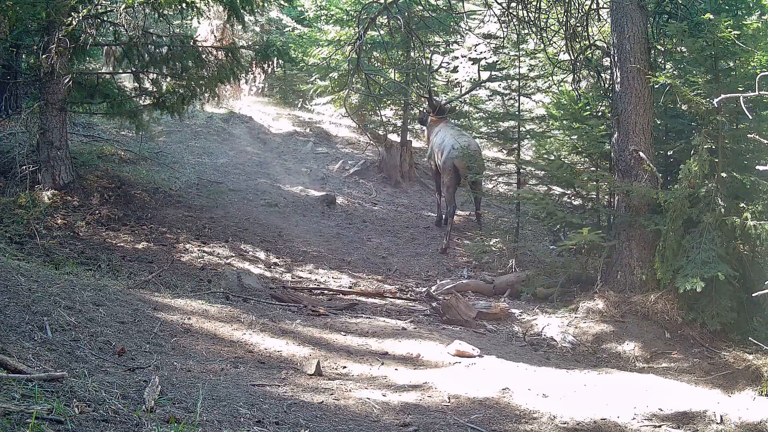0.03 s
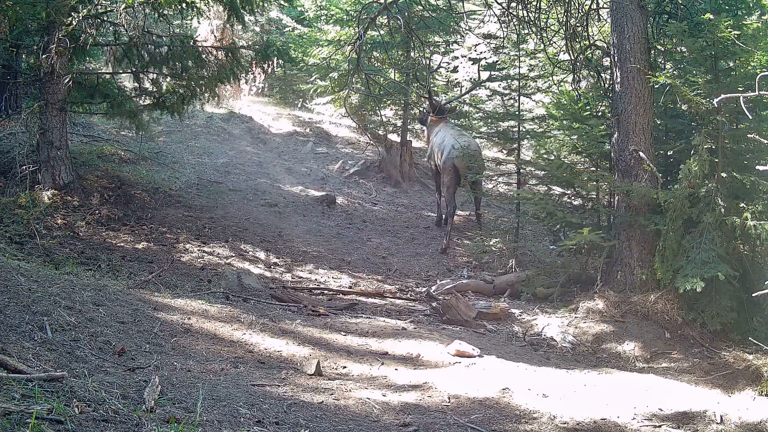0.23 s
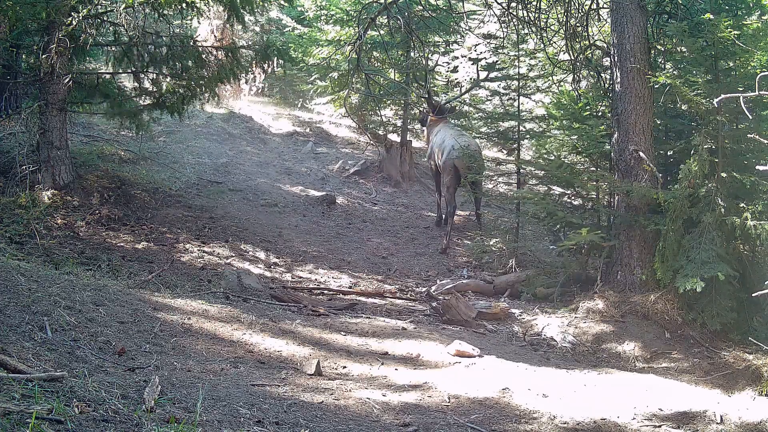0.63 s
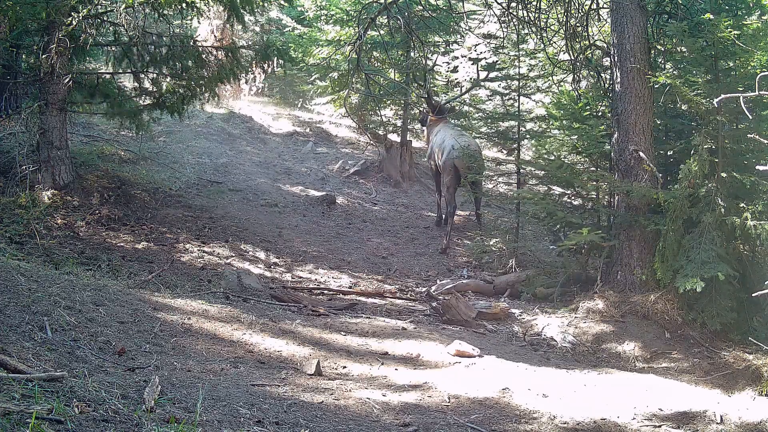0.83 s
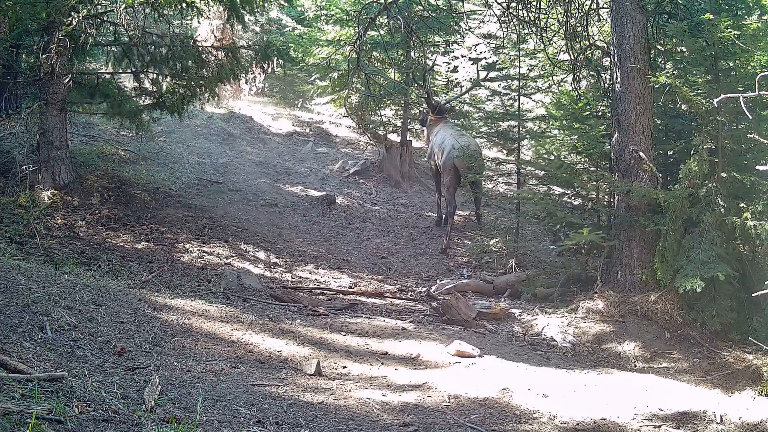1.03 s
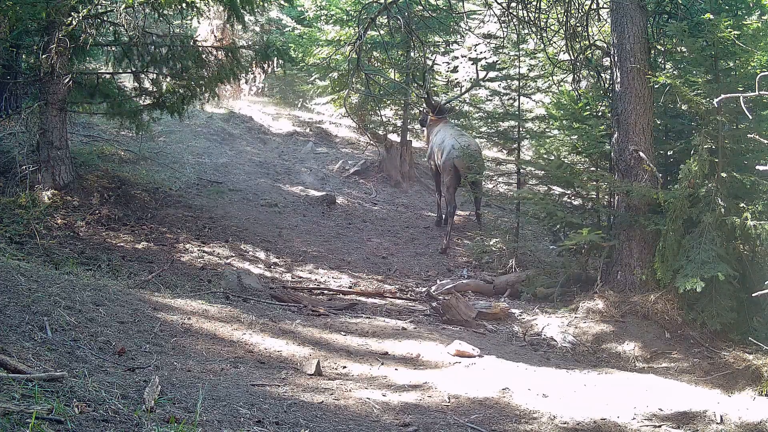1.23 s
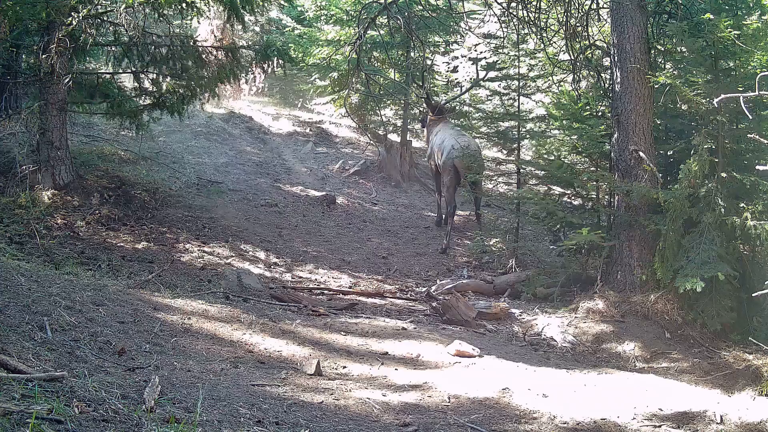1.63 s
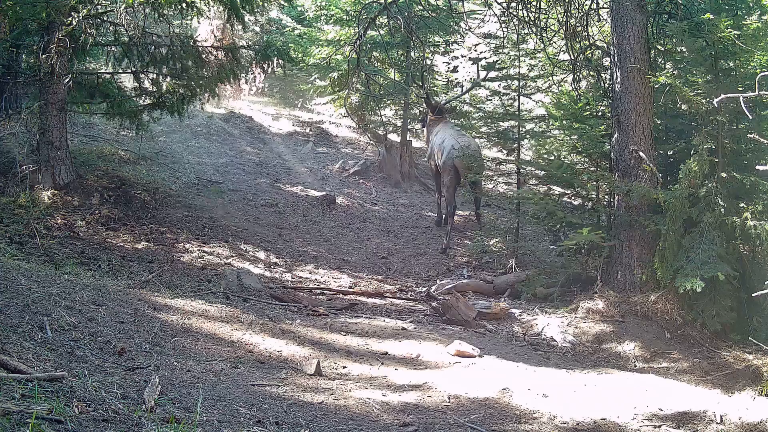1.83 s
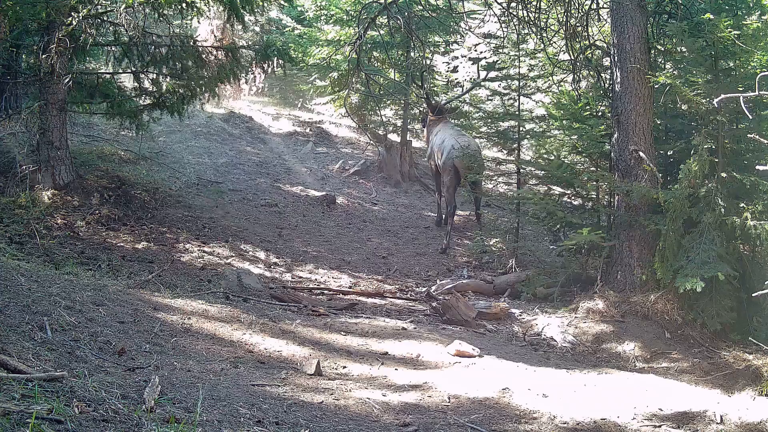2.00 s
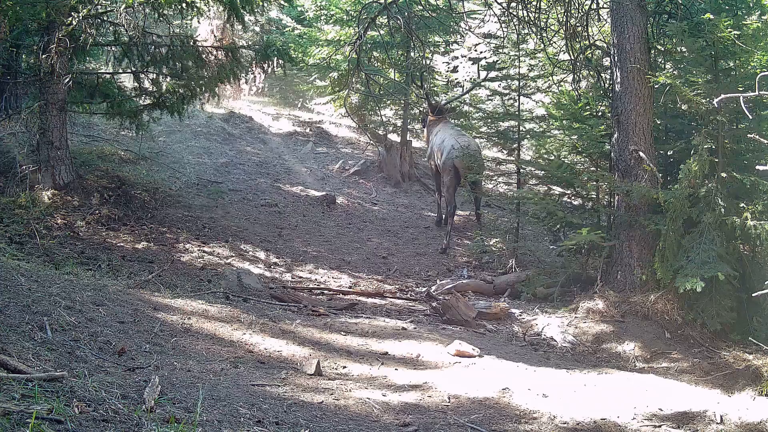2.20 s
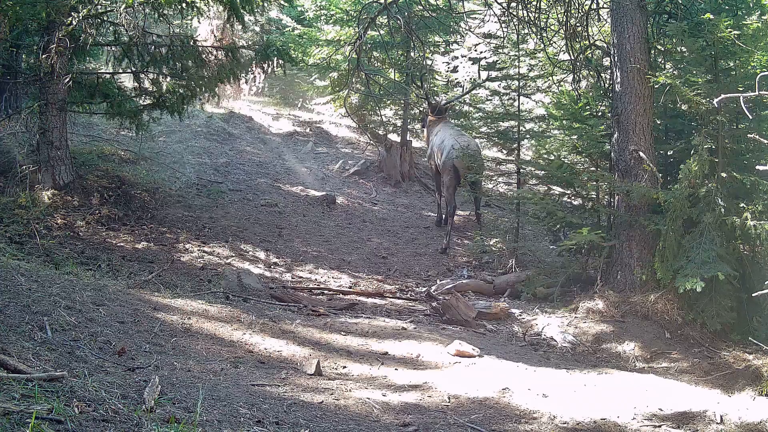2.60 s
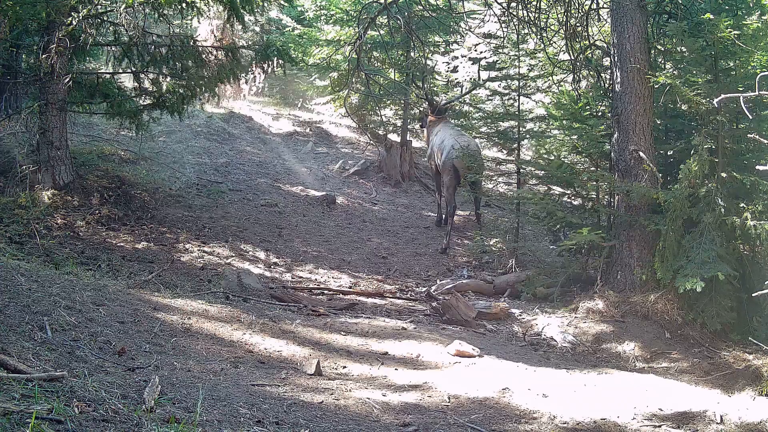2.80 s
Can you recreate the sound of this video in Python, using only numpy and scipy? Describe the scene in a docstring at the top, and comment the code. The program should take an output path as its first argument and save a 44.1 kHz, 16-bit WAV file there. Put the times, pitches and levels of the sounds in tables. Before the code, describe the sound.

Light wind buffeting the microphone in short, low puffs, over a faint forest hush.

```python
"""Light wind on a forest slope.

A quiet spot among trees. Right at the microphone, light wind buffets in short, low puffs,
and a few single eddies thump on it. Far behind lie the hush of the trees and a faint hiss,
with a soft swish, some brief dry rustles of twigs and three soft woody knocks."""
import sys
import numpy as np
from scipy import signal
from scipy.io import wavfile
from scipy.ndimage import uniform_filter1d

SR = 44100
rng = np.random.default_rng(int(sys.argv[2]) if len(sys.argv) > 2 else 0)


def dump(signal):
    """Clip the signal to [-1, 1] and save it as 16-bit WAV at the path in sys.argv[1]."""
    limited = np.clip(np.atleast_2d(signal).T, -1, 1)
    pcm = np.round(limited * 32767).astype(np.int16)
    wavfile.write(sys.argv[1], SR, pcm)


N = 130095
TIME = np.arange(N) / SR


def from_db(db):
    """Decibels to gain."""
    return 10 ** (np.asarray(db) / 20)


def unit_rms(x):
    """Scale to an rms of 1."""
    return x / np.sqrt(np.mean(x ** 2) + 1e-20)


def butter(x, hz, kind, order=2):
    """Butterworth filter."""
    return signal.sosfilt(signal.butter(order, hz, kind, fs=SR, output="sos"), x + 1e-18)


def resonance(x, hz, width_hz):
    """Ring x through one resonant peak; rms 1."""
    radius = np.exp(-np.pi * width_hz / SR)
    feedback = [1, -2 * radius * np.cos(2 * np.pi * hz / SR), radius ** 2]
    return unit_rms(signal.lfilter([1, 0, -1], feedback, x))


def drift(rate_hz):
    """Random wander, mostly slower than rate_hz; rms 1."""
    pole = np.exp(-2 * np.pi * rate_hz / SR)
    wander = signal.lfilter([1], [1, -2 * pole, pole ** 2], rng.standard_normal(N + SR))
    return unit_rms(wander[SR:])


def coloured_noise(colour, flicker_db=0):
    """Third-octave bands of noise, each with its own level and optional flicker; rms 1."""
    edges_hz = 20 * 2 ** (np.arange(28) / 3)
    hz, db = np.transpose(colour)
    white, out = rng.standard_normal((2, N + SR)), 0
    for k, (low, high) in enumerate(zip(edges_hz, edges_hz[1:])):
        band_db = np.interp(np.log(low * high) / 2, np.log(hz), db)
        if flicker_db:
            band_db = band_db + flicker_db * drift(20)
        out = out + from_db(band_db) * butter(white[k % 2], [low, high], "band")[SR:]
    return unit_rms(out)


def ramp(t, rise_s):
    """Smooth step from 0 to 1, centred on t = 0."""
    return .5 + .5 * np.sin(np.pi * np.clip(t / rise_s, -.5, .5))


def burst(peak_s, attack_s, decay_s):
    """Quick rise to peak_s, then exponential decay."""
    rise = ramp(TIME - peak_s + attack_s / 2, attack_s)
    return rise * np.exp(-np.maximum(TIME - peak_s, 0) / decay_s)


def puffs():
    """Short stretches of turbulence on the microphone; faster air reaches higher in pitch."""
    # puffs of wind: start_s, length_s, level_db, upper_edge_hz
    gusts = [(.02, 0.063, -55.5, 210), (0.08, 0.022, -47, 55), (0.194, 0.07, -29, 145),
             (0.289, .075, -34.5, 114), (0.414, 0.042, -30.5, 66.7), (0.455, 0.04, -45, 70),
             (0.517, 0.0885, -31.5, 150), (0.615, 0.037, -29, 105), (0.727, 0.026, -28.5, 104),
             (0.774, 0.047, -36, 94), (0.845, 0.081, -36.5, 96.5), (.92, 0.05, -39, 123.3),
             (1.047, 0.017, -55, 90), (1.138, 0.064, -38.5, 85), (1.472, 0.047, -43.5, 68.6),
             (1.559, 0.056, -49, 83), (1.641, 0.021, -41, 68), (1.697, 0.021, -36, 105),
             (1.734, 0.16, -45.5, 118), (1.806, 0.023, -28, 126.6), (1.837, 0.021, -37, 89),
             (1.961, 0.049, -35.5, 70.5), (1.995, 0.053, -32, 121.5), (2.056, 0.036, -39.5, 94),
             (2.171, 0.049, -35.5, 83), (2.389, 0.039, -25.5, 107.6), (2.453, 0.039, -28.5, 115),
             (2.491, 0.047, -48, 105), (2.524, 0.037, -26, 126), (2.575, 0.13, -40, 91.6),
             (2.616, 0.065, -25, 95), (2.68, 0.024, -35.5, 94), (2.708, 0.032, -49.5, 74.4),
             (2.808, 0.039, -42.5, 66.4)]
    attack_s, release_s, even_s = .022, .023, .031
    out = np.zeros(N + 2 * SR)
    t = np.arange(SR) / SR - .5
    for start_s, length_s, level_db, edge_hz in gusts:
        air = butter(rng.standard_normal(SR), edge_hz, "low", order=5)
        air = butter(air, .37 * edge_hz, "low", order=1)  # the spectrum tilts down below the edge
        air = butter(air, .13 * edge_hz, "high")
        power = uniform_filter1d(np.abs(signal.hilbert(air)) ** 2 / 2, int(even_s * SR) + 1)
        even_air = air / np.sqrt(power + 1e-20)  # turbulence keeps its strength over even_s
        gate = ramp(t, attack_s) * ramp(length_s - t, release_s)
        at = int((start_s + .5) * SR)
        out[at:at + SR] += from_db(level_db) * gate * even_air
    return out[SR:SR + N]


def thumps():
    """An eddy passing the microphone gives one swing of pressure, push then pull."""
    # single eddies: time_s, peak_db, centre_hz
    eddies = [(.211, -33.5, 101), (0.236, -41, 130), (.358, -35, 108), (.436, -30.5, 50),
              (0.608, -19, 91.8), (0.757, -35.5, 131), (.902, -25, 78.7), (.953, -38.5, 115),
              (1.703, -38, 69), (1.786, -20, 102.8), (2.627, -29, 75.3)]
    out = np.zeros(N)
    for time_s, peak_db, centre_hz in eddies:
        phase = 2 * np.pi * centre_hz * (TIME - time_s)
        out -= from_db(peak_db) * phase * np.exp((1 - phase ** 2) / 2)
    return out


def draught():
    """Lightly moving air keeps up a low, wavering rumble between the puffs."""
    # strength of the draught: time_s, level_db
    strength = [(0, -54.5), (.15, -58.5), (.5, -51), (1.0, -52.5), (1.25, -53.5), (1.38, -55), (1.6, -47),
                (1.92, -52), (2.3, -51), (2.77, -55.5), (2.95, -54.5)]
    # its spectrum: frequency_hz, relative_db
    colour = [(20, 4), (50, 4), (100, -8.5), (160, -13.5), (250, -21.5), (400, -41.5), (800, -54)]
    level_db = np.interp(TIME, *np.transpose(strength)) + drift(2.7)
    return from_db(level_db) * coloured_noise(colour)


def wind():
    """Puffs and thumps enter the microphone port, which passes a low band, over the draught."""
    port_low_hz, port_high_hz = 22.4, 267
    buffets = butter(puffs() + thumps(), port_high_hz, "low", order=4)
    return butter(buffets, port_low_hz, "high") + draught()


def knocks():
    """A rough contact on wood rings two damped resonances and scuffs the ground."""
    # soft knocks: peak_s, level_db, decay_s, pitch_hz, overtone_db, scuff_db
    contacts = [(.553, -53, .007, 1110, -72, -58.5), (.833, -63.5, .02, 1030, -66, -58),
                (1.698, -60, .014, 650, -78, -78)]
    # spectrum of the scuff: frequency_hz, relative_db
    colour = [(200, -9.5), (350, 2), (600, 4.5), (1000, 3), (1400, -18), (1800, -16), (2200, -18),
              (5000, -51.5)]
    attack_s, jitter_hz, overtone_ratio = .009, 45, 1.65
    out, scuff = np.zeros(N), coloured_noise(colour)
    for peak_s, level_db, decay_s, pitch_hz, overtone_db, scuff_db in contacts:
        phase = 2 * np.pi * np.cumsum(pitch_hz + jitter_hz * drift(300)) / SR
        overtone = from_db(overtone_db) * np.sin(overtone_ratio * phase)
        ring = np.sqrt(2) * (from_db(level_db) * np.sin(phase) + overtone)
        out += burst(peak_s, attack_s, decay_s) * (ring + from_db(scuff_db) * scuff)
    return out


def rustles():
    """Short, grainy brushes set dry twigs and needles ringing."""
    # dry rustles: peak_s, level_db, decay_s, relative_ring_db
    brushes = [(0.033, -64, 0.0082, -3), (0.064, -63.5, 0.047, -5), (.212, -59, 0.048, 2),
               (.412, -66, .04, 1), (.69, -55.5, .015, -5), (0.704, -58.5, 0.031, -3.5),
               (0.944, -66.5, .02, -2), (1.466, -67, .03, 0), (1.495, -71.5, .02, 4), (1.74, -68.5, .02, 5),
               (1.94, -64.5, 0.017, 4.5)]
    # resonances of twigs and needles: pitch_hz, width_hz, relative_db
    modes = [(2175, 140, -11), (2860, 160, -12.5), (4780, 410, -8.5), (5340, 290, -10.5), (7050, 300, -6.5)]
    # spectrum of the brushing: frequency_hz, relative_db
    colour = [(1000, -27.5), (1700, -15), (2500, -15), (3700, 1.5), (5500, -3), (7200, -7), (8500, 16)]
    attack_s, grain_db = .017, 3
    grain = from_db(grain_db * drift(rate_hz=540))
    rings = sum(from_db(db) * resonance(grain * rng.standard_normal(N), hz, width_hz)
                for hz, width_hz, db in modes)
    friction = unit_rms(grain * coloured_noise(colour))
    out = np.zeros(N)
    for peak_s, level_db, decay_s, ring_db in brushes:
        texture = unit_rms(friction + from_db(ring_db) * rings)
        out += from_db(level_db) * burst(peak_s, attack_s, decay_s) * texture
    return out


def swish():
    """A soft swish that holds for about a second, then fades away."""
    # course of the swish: time_s, level_db
    strength = [(0, -71), (.12, -67.5), (.35, -73.5), (.7, -72), (.92, -71.5), (1.2, -72.5), (2.95, -90)]
    # its spectrum: frequency_hz, relative_db
    colour = [(400, -11.5), (800, 4), (1300, -1.5), (2000, -12), (3500, -11.5), (5200, -10), (8000, -12.5)]
    return from_db(np.interp(TIME, *np.transpose(strength))) * coloured_noise(colour)


def far_trees():
    """The steady hush of distant trees and a faint hiss, flickering slightly."""
    # spectrum of hush and hiss: frequency_hz, relative_db
    colour = [(90, -4), (180, -2), (300, -0.5), (400, -1.5), (600, -0.5), (780, -1), (1050, -8),
              (1500, -8.5), (2000, -13.5), (3500, -15.5), (5200, -15.5), (7200, -18.5), (8500, -13.5)]
    return from_db(-64) * coloured_noise(colour, flicker_db=1.05)


def scene():
    """Close wind and the forest behind it, at one microphone."""
    return (wind() + far_trees() + swish() + rustles() + knocks())[None]


def record(dry):
    """The recorder cuts the top steeply."""
    return butter(dry, hz=7600, kind="low", order=19)


dry = scene()
out = record(dry)
dump(out)
```